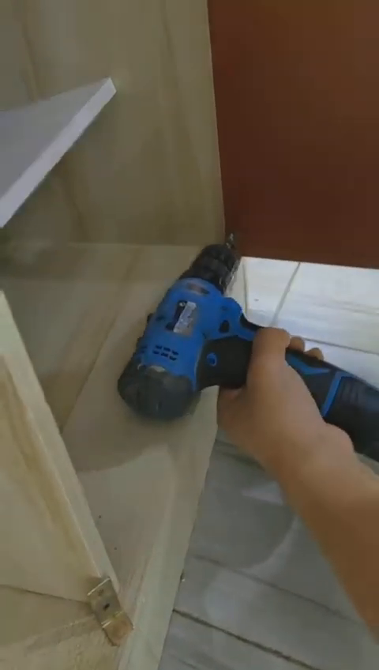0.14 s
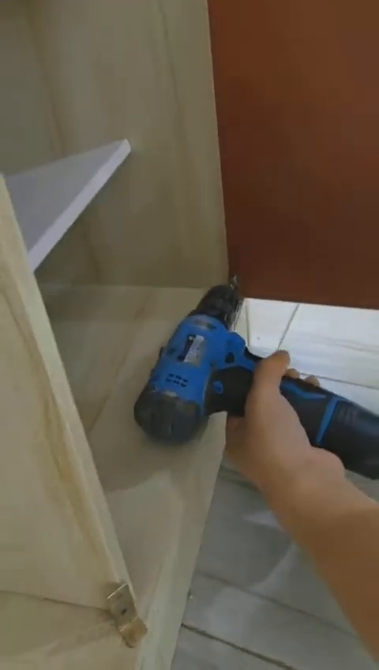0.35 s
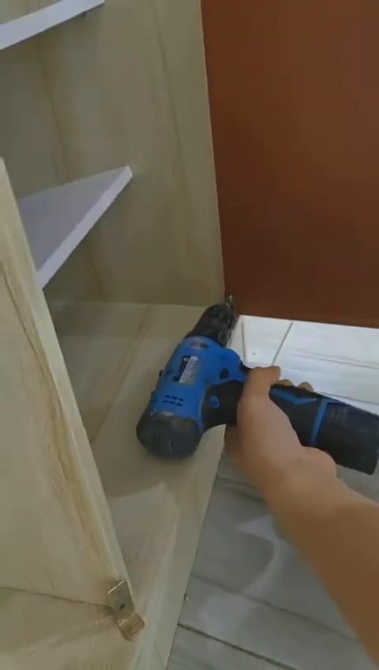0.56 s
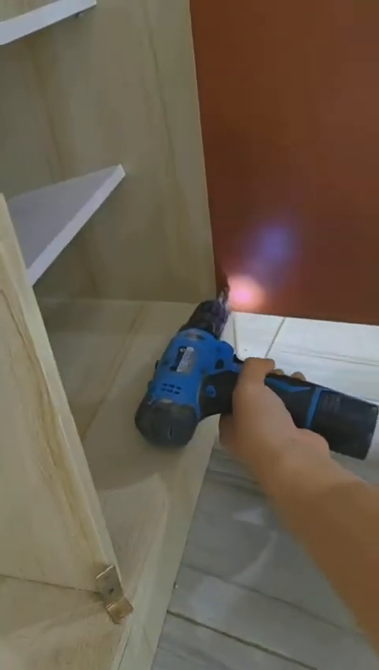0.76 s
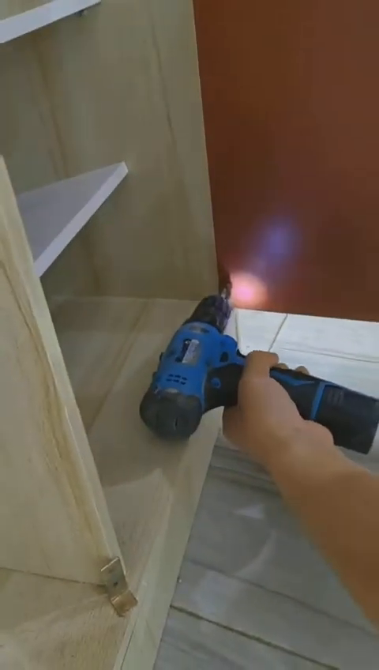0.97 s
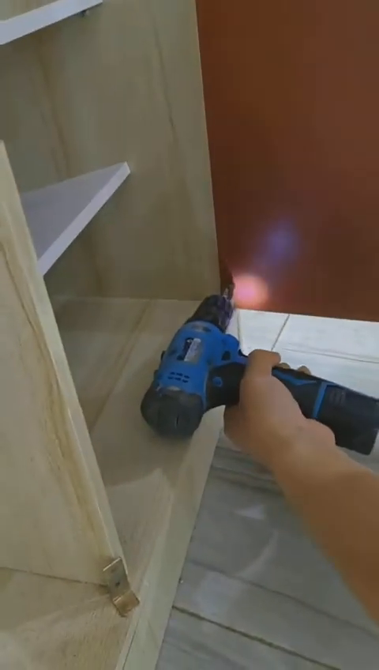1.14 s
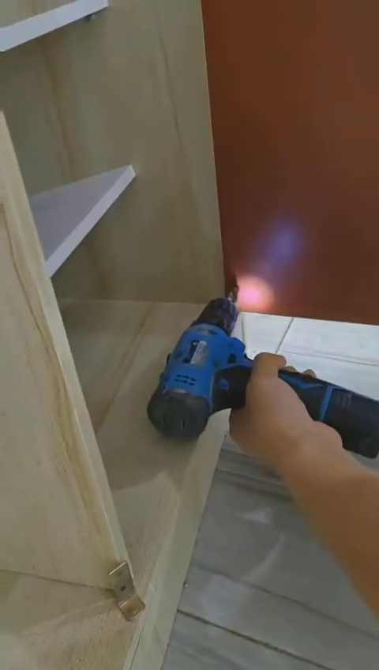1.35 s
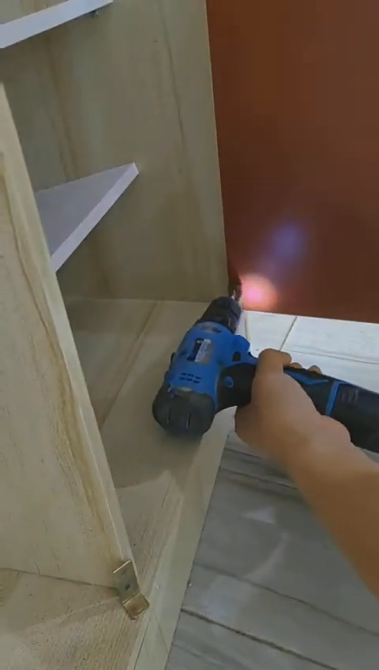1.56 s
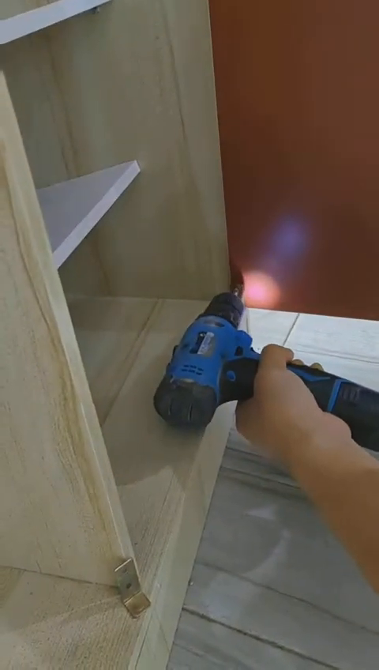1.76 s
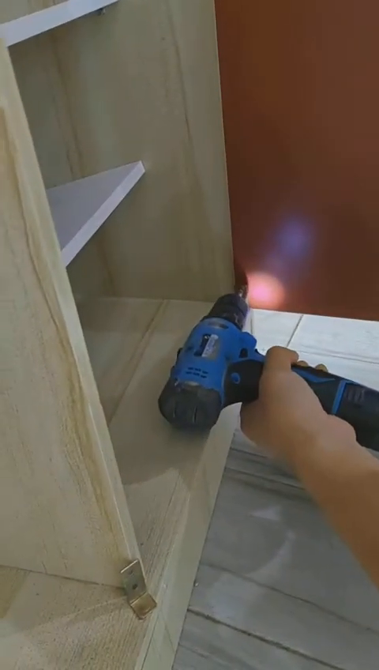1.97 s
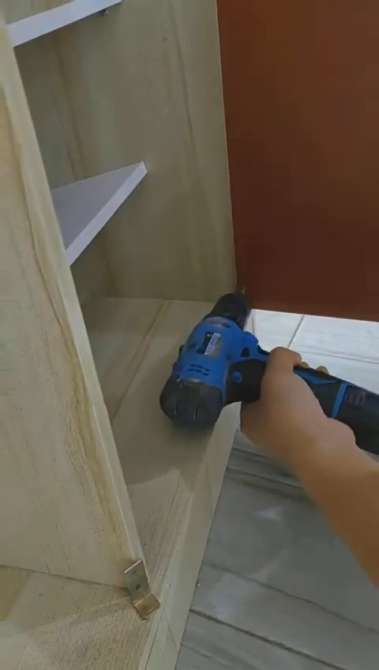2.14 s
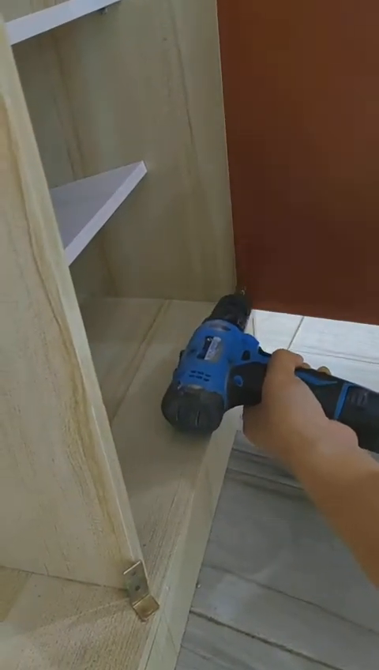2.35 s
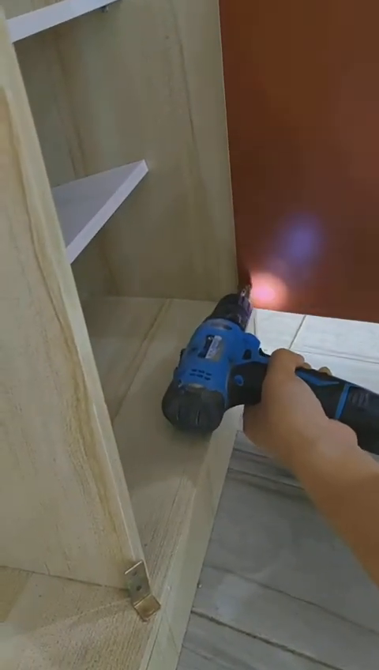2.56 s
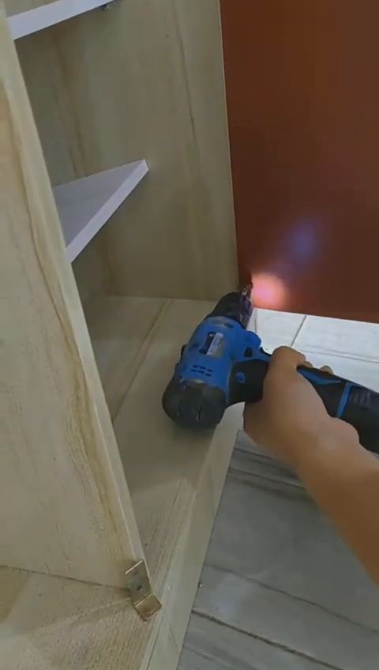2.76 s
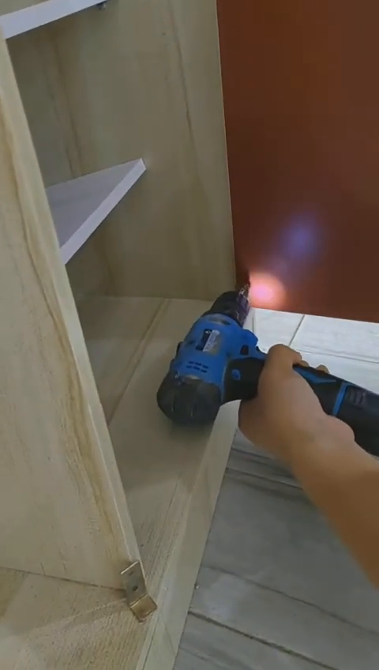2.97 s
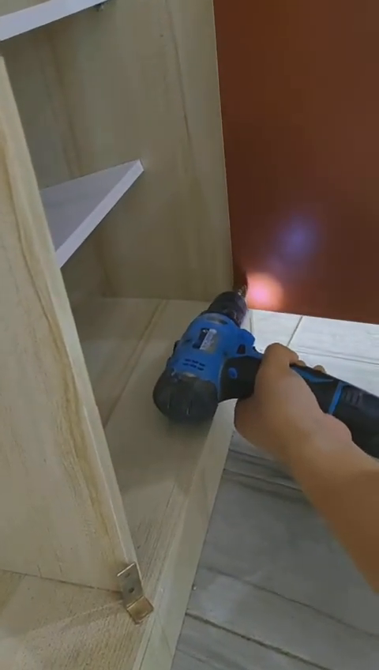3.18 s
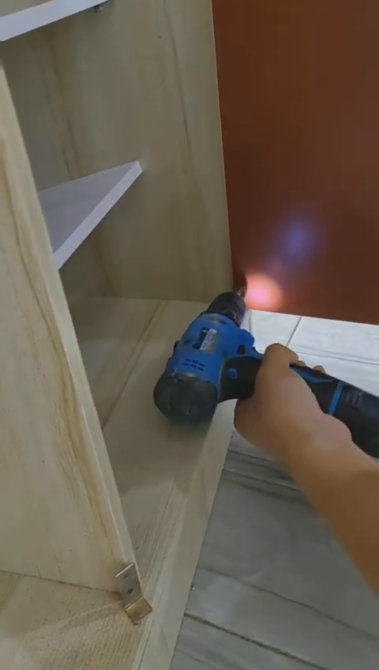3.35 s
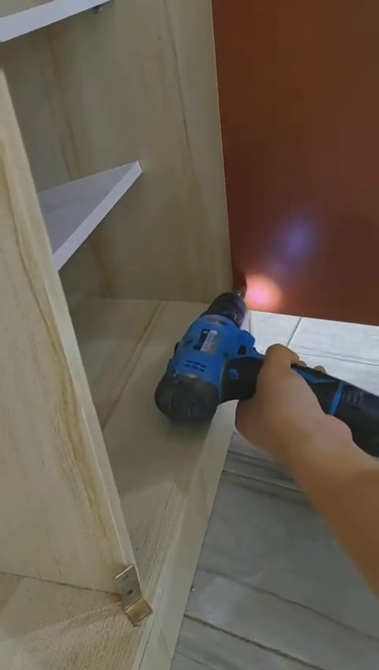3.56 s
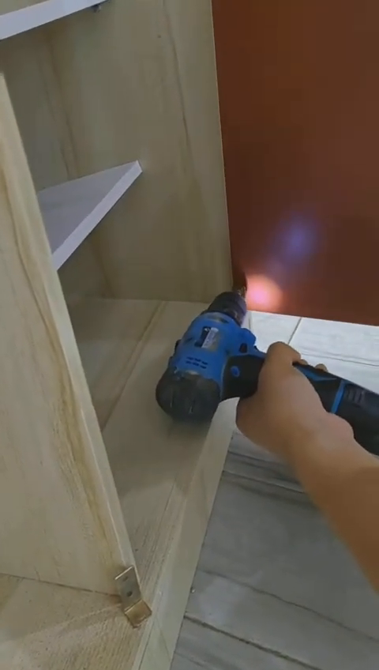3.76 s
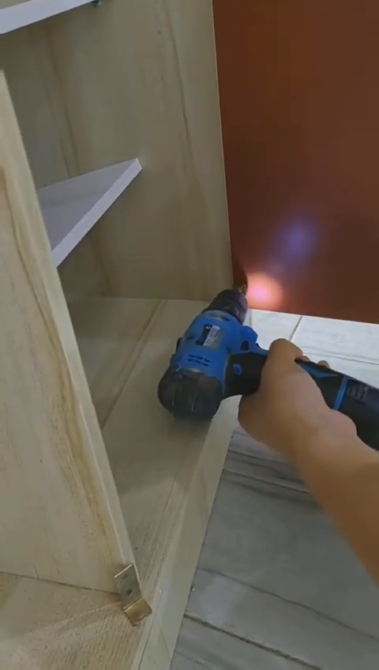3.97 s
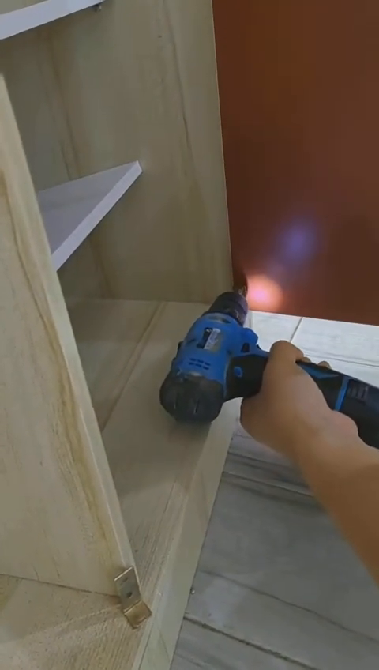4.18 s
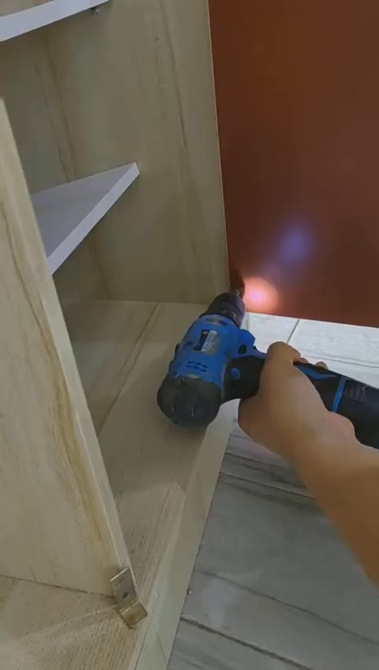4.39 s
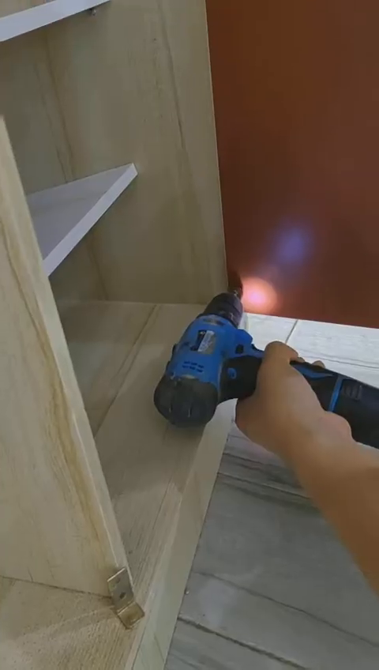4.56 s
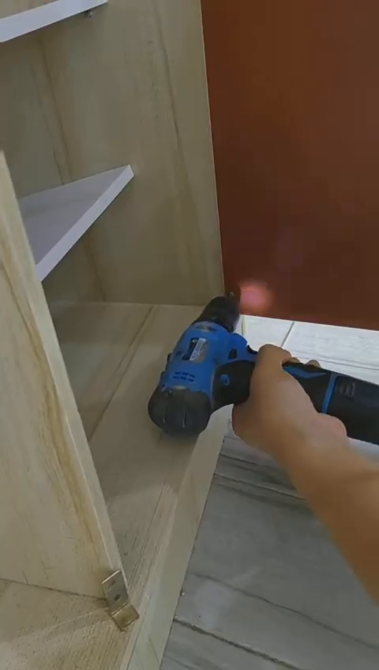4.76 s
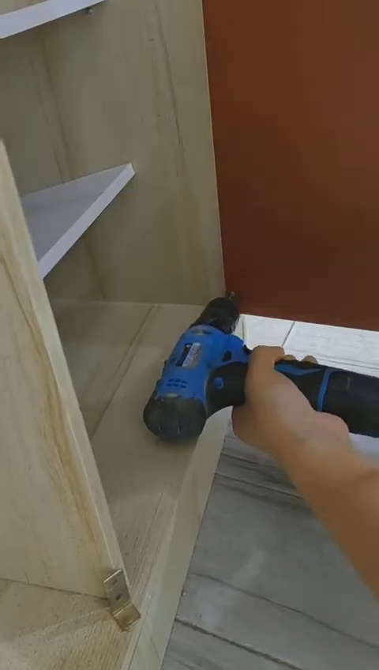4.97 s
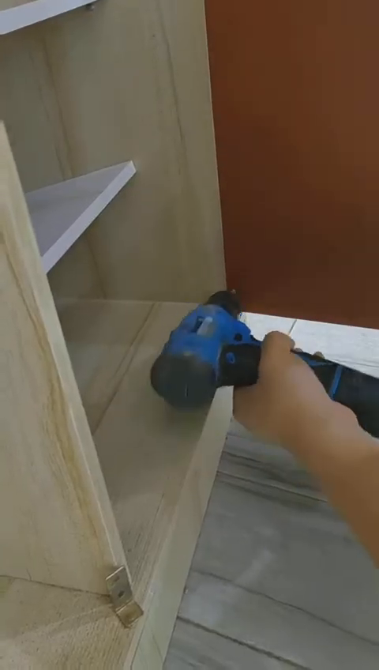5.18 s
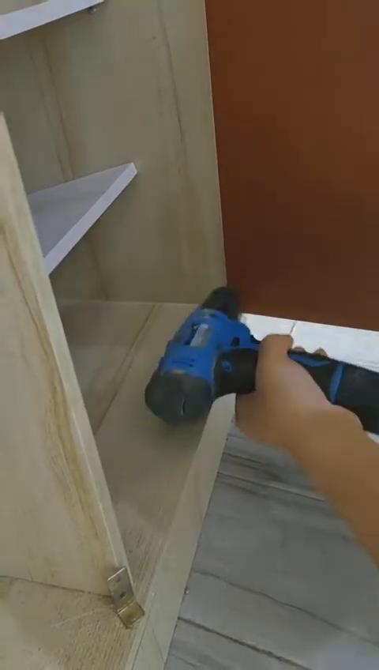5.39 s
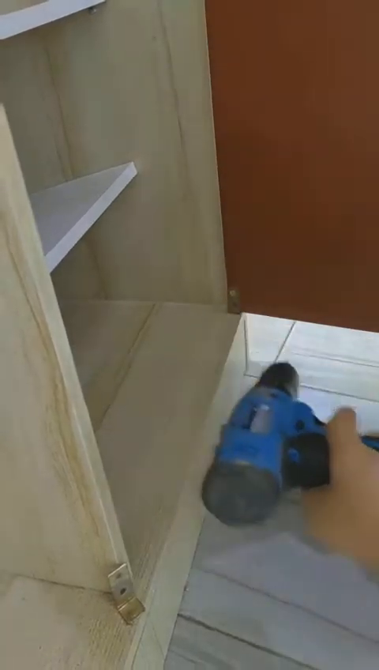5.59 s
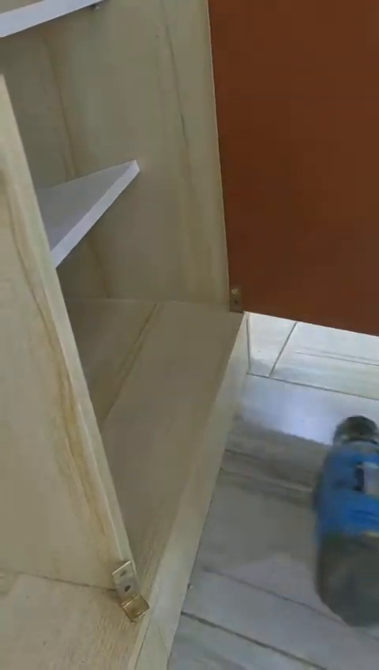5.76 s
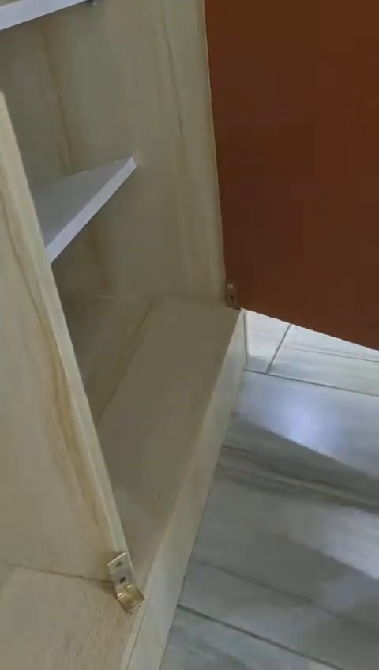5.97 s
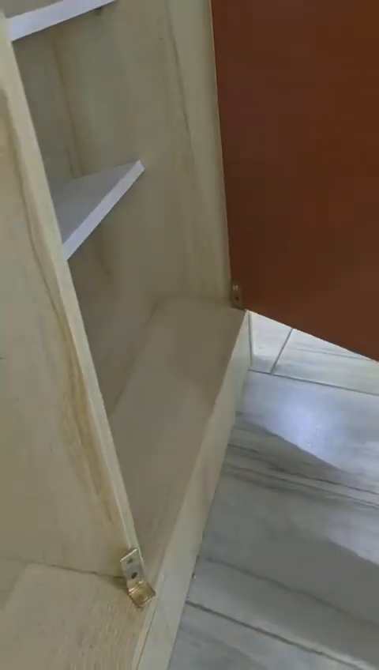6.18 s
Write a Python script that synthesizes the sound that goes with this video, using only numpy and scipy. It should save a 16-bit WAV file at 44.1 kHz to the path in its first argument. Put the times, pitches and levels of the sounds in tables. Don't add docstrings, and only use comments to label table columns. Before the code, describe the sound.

Soft rustling and hollow taps, then a small power drill buzzes briefly, pauses, whines steadily for two seconds, stops abruptly, and fabric brushes past.

```python
import sys
import numpy as np
from scipy import signal
from scipy.fft import rfft, irfft, next_fast_len
from scipy.io import wavfile
from scipy.ndimage import uniform_filter1d, map_coordinates

SR = 44100
rng = np.random.default_rng(int(sys.argv[2]) if len(sys.argv) > 2 else 0)


def level_to_linear(level):
    exponent = np.asarray(level, float) / 20
    return 10 ** exponent


def transcribe(signal):
    frames = np.atleast_2d(signal).T
    limited = np.clip(frames, -1, 1)
    pcm = np.round(limited * 32767).astype(np.int16)
    wavfile.write(sys.argv[1], SR, pcm)


N = 274743


def unit(x):
    return x / np.sqrt(np.mean(x ** 2) + 1e-20)


def along(points, hz):
    f, v = np.transpose(points)
    return np.interp(np.log(hz + 1), np.log(f + 1), v)


def curves(tables):
    t = np.arange(N) / SR
    s, *cols = np.transpose(np.concatenate(tables))
    gate = sum((t >= rows[0][0]) & (t <= rows[-1][0] + 0.05) for rows in tables) > 0
    return [np.interp(t, s, c) for c in cols] + [uniform_filter1d(gate * 1.0, size=64)]


def swells(rows, edge_s):
    t = np.arange(N) / SR
    gain = np.zeros(N)
    for start, length, db in rows:
        inside = np.minimum(t - start, start + length - t)
        gain += level_to_linear(db) * np.sin(np.pi / 2 * np.clip(inside / edge_s + 0.5, 0, 1)) ** 2
    return gain


def wobble(rate):
    coarse = np.arange(0, N + 8, 8)
    knots = rng.standard_normal(int(N * rate / SR) + 4)
    return np.interp(np.arange(N), coarse, map_coordinates(knots, [coarse * rate / SR]))


def filtered(x, response):
    m = next_fast_len(N + SR // 2)
    return irfft(rfft(x, m) * response(np.fft.rfftfreq(m, 1 / SR)), m)[:N]


def peak(f, hz, width):
    return 1j * f * width / (hz * hz - f * f + 1j * f * width)


def grit(spread_db):
    return unit(rng.standard_normal(N) * level_to_linear(spread_db * wobble(rate=1200)))


def rings(events, attack_s):
    out, t = np.zeros(N + SR), np.arange(SR // 3) / SR
    for s, db, hz, t60 in events:
        drift = np.cumsum(rng.standard_normal(len(t))) * 0.01
        ring = level_to_linear(-60 * t / np.clip(t60, 0.01, 0.5)) * np.sin(2 * np.pi * hz * t + drift)
        out[round(s * SR):][:len(t)] += level_to_linear(db) * ring * (1 - np.exp(-t / attack_s))
    return out[:N]


def clacks(events, sharp, attack_s, dull_hz):
    out, t = np.zeros(N + SR), np.arange(SR // 4) / SR
    f = np.fft.rfftfreq(len(t), 1 / SR)
    for s, db, hz, t60, splash_db in events:
        contact = level_to_linear(-60 * t / np.clip(0.59 * t60, 0.02, 0.4))
        room = level_to_linear(-19.0 - 60 * t / 0.52)
        burst = rng.standard_normal(len(t)) * (contact + room) * (1 - np.exp(-t / attack_s))
        colour = peak(f, hz, hz / sharp) + level_to_linear(splash_db - 2) * peak(f, 1.4 * hz, 1.8 * hz)
        bass_cut = (1j * f / (1j * f + 0.43 * hz)) ** 2
        clack = irfft(rfft(burst) * colour * bass_cut / (1 + 1j * f / dull_hz) ** 3, len(t))
        out[round(s * SR):][:len(t)] += level_to_linear(db) * clack / np.abs(clack).max()
    return out[:N]


# pitch_hz, density_db
AIR_COLOUR = [(200, -27.5), (340, -9), (437, -24.5), (645, -34.5), (682, 0.5), (784, 6), (1430, -20),
              (1710, -9.5), (6430, -21), (8500, -18.5), (9500, -33.5), (12400, -70), (20900, -120)]
AIR_DB = -68.5


def air():
    hiss = filtered(rng.standard_normal(N), lambda f: level_to_linear(along(AIR_COLOUR, f)))
    rumble = filtered(rng.standard_normal(N), lambda f: peak(f, 60, 24.0) + 0.5 * peak(f, 30, 26))
    return level_to_linear(AIR_DB + 0.41 * wobble(rate=12)) * (unit(hiss) + level_to_linear(9) * unit(rumble))


# start_s, peak_db, room_db (re blow)
KNOCK = [
    (0.987, -19.5, 7),
]
# pitch_hz, density_db
BOARD_COLOUR = [(360, -61.5), (620, -27), (882, -0.5), (1240, -6), (2930, -7.5), (3210, -18.5),
                (3510, -10.5), (6660, -18.5), (8420, -16.5), (12000, -25.5), (14000, -45)]
# pitch_hz, t60_s
ROOM_DECAY = [(500, 1), (1000, 0.86), (3000, 0.49), (8000, 0.52), (13000, 0.51)]


def knock():
    (s, db, room_db), = KNOCK
    hz, t, z = signal.stft(rng.standard_normal(SR), SR, nperseg=256)
    decay = level_to_linear(-60 * t / along(ROOM_DECAY, hz)[:, None])
    tail = signal.istft(z * decay, SR, nperseg=256)[1][:SR]
    t = np.arange(SR) / SR
    blow = rng.standard_normal(SR) * level_to_linear(-60 * t / 0.2) + level_to_linear(room_db - 14.5) * tail
    out = np.zeros(N + SR)
    out[round(s * SR) - 200:][:SR] = blow * (1 - np.exp(-t / 0.0078))
    struck = filtered(out[:N], lambda f: level_to_linear(along(BOARD_COLOUR, f)))
    return level_to_linear(db - 0.5) * struck / np.abs(struck).max()


# pitch_hz, width_hz
CABINET_MODES = [(108, 67), (200, 30.4), (500, 387)]
CALM_DB, DRIVEN_DB = [-71, -69.5, -69], [-27, -25.5, -28.5]
# start_s, length_s, level_db
LEANS = [
    [(.3, 0.26, -59), (.72, 0.71, -55.5), (1.69, 0.12, -39), (2.0, 0.785, -57.5), (3.08, .3, -56),
     (4.2, 0.52, -51.5), (4.74, 0.22, -45), (5.15, 0.21, -57.5)],
    [(.1, 0.13, -62.5), (.6, 0.36, -58), (1.15, 0.13, -64), (1.7, 0.1, -39), (2.3, .3, -61.5),
     (3.63, 0.525, -50), (4.82, 0.09, -53)],
    [(.33, 0.34, -58.5), (1.05, 0.44, -55), (1.7, 0.088, -51), (3.9, 1, -52.5), (5.7, 0.43, -68.5)],
]
LEAN_S = 0.054
# start_s, peak_db, pitch_hz, t60_s
THUMPS = [(0.73, -38.5, 191, 0.22), (0.862, -39.5, 197, 0.21), (0.954, -41, 184, 0.13),
          (1.1, -41.5, 196.4, 0.35), (1.241, -41, 182, 0.15), (1.334, -43, 201, 0.41),
          (1.526, -36.5, 183, 0.16), (1.681, -27, 133.7, 0.14), (1.739, -21.5, 102, 0.16),
          (2.082, -34.5, 169, 0.12), (2.314, -31, 186, 0.14), (2.434, -47.5, 94.2, 0.15),
          (2.519, -49, 99.6, 0.15), (2.566, -40, 136, 0.13), (2.607, -37.5, 197, 0.11),
          (2.689, -52, 121, 0.099), (2.745, -40.5, 198.5, 0.17), (2.871, -40.5, 189, 0.15),
          (3.049, -36, 201, 0.31), (3.661, -44.5, 213, 0.15), (4.24, -40, 139, 0.18),
          (5.178, -32.5, 91.5, 0.077), (5.21, -37, 131, 0.15), (5.248, -55, 120, 0.19),
          (5.299, -39, 99, 0.15)]
# start_s, peak_db, pitch_hz, t60_s, splash_db (re centre)
TAPS = [(1.134, -28.5, 476, 0.12, -18), (1.17, -40, 514, .3, -16), (1.736, -28, 764, .1, -6),
        (1.339, -46, 534, 0.29, -1), (1.4, -43, 721, 0.24, -33), (1.741, -24, 422, 0.12, -17),
        (2.179, -28, 808, 0.54, -3), (3.086, -27.5, 437, 0.14, -10), (3.119, -31.5, 244, 0.25, -14),
        (5.189, -49.5, 290, 0.17, -16), (5.229, -53, 307, 0.11, -25)]


def cabinet():
    gear_db, gate = curves(GEARS)
    hum = np.zeros(N)
    for (hz, width), calm, driven, leans in zip(CABINET_MODES, CALM_DB, DRIVEN_DB, LEANS):
        push = rng.standard_normal(N) * level_to_linear(1.5 * wobble(rate=14))
        mode = unit(filtered(push, lambda f: peak(f, hz, width) ** 2))
        hum += mode * (level_to_linear(calm) + gate * level_to_linear(gear_db + driven) + swells(leans, LEAN_S))
    return hum + rings(THUMPS, attack_s=0.003) + clacks(TAPS, sharp=14.0, attack_s=0.0015, dull_hz=2500)


# start_s, drag_db, tightness_db (brings out the thin hiss)
SLIDES = [
    [(0.0, -66, 5), (0.04, -67.5, 6), (0.128, -70, -8), (0.195, -55, 8.5), (0.29, -56, 3.5),
     (0.394, -45, 1), (0.45, -54.5, 8.5), (0.588, -51.5, 14), (0.73, -59, 8.5)],
    [(0.78, -64, 1), (0.9, -67.5, -6), (0.918, -57, -18), (0.96, -62.5, -16)],
    [(5.41, -73, -5), (5.456, -55.5, -7), (5.55, -58.5, 2.5), (5.62, -52.5, -2), (5.68, -55, 1),
     (5.76, -56.5, 1.5), (5.91, -54.5, 4.5), (6.05, -54.5, 2.5), (6.23, -59, 3)],
]
# pitch_hz, width_hz
CLOTH_BANDS = [(950, 320), (2300, 2200), (4800, 2000), (7000, 400), (11200, 6000), (6000, 1600),
               (2050, 1500)]
# start_s, length_s, level_db
HOLLOW = [
    (0.17, 0.044, -59),
    (0.3, 0.29, -53),
    (5.48, 0.2, -61.5),
    (5.76, 0.11, -52.5),
    (5.96, .15, -55),
]
# start_s, length_s, level_db
RASP = [
    (0.2, .1, -81),
    (0.34, 0.22, -54),
    (5.62, 0.065, -69),
    (5.78, 0.091, -49.5),
    (6.0, 0.093, -53.5),
]
STROKE_S, FOLD_DB, WEAVE_DB = 0.076, -7.5, -6.5
# start_s, length_s, level_db
FUZZ = [
    (.18, .12, -75),
    (.33, 0.43, -69),
    (5.45, .85, -67.5),
    (5.78, .04, -62),
    (6.0, .12, -73),
]
# start_s, length_s, level_db
SEAM = [
    (0.2, .45, -60.5),
    (5.8, 0.15, -49.5),
    (5.97, .17, -47),
]
# start_s, length_s, level_db
SCRAPE = [
    (5.445, 0.125, -49),
    (5.607, 0.046, -48),
]


def cloth():
    drag_db, tight_db, gate = curves(SLIDES)
    catch = level_to_linear(0.88 * wobble(rate=60))
    drag = gate * level_to_linear(drag_db)
    fold = swells(HOLLOW, STROKE_S) + drag * level_to_linear(FOLD_DB)
    weave = swells(RASP, STROKE_S) + drag * level_to_linear(WEAVE_DB + 0.81 * tight_db)
    hiss = drag * level_to_linear(tight_db)
    fibres, seam = swells(FUZZ, STROKE_S), swells(SEAM, STROKE_S)
    gains = (fold, drag, weave, hiss, fibres, seam, swells(SCRAPE, 0.024))
    out = np.zeros(N)
    for gain, (hz, width) in zip(gains, CLOTH_BANDS):
        out += gain * unit(filtered(grit(spread_db=0.5) * catch, lambda f: peak(f, hz, width) ** 2))
    return out


# start_s, peak_db, pitch_hz, t60_s, splash_db (re centre)
TICKS = [(0.371, -40, 3100, 0.1, 2), (0.688, -39, 3030, 0.1, -6), (0.7342, -41, 3100, 0.08, -22),
         (0.8086, -39.5, 3600, 0.068, -6), (0.915, -46, 1720, 0.1, -16), (1.2374, -49.5, 1530, 0.07, 6),
         (1.333, -37.5, 2850, 0.083, -19), (1.3962, -48.5, 7100, 0.71, -4.5),
         (1.5594, -18.5, 3270, 0.086, -5.5), (2.5106, -39, 2940, 0.089, -24), (2.527, -48, 3060, 0.1, -6),
         (2.6055, -57, 3270, 0.1, -16), (2.744, -48, 2900, 0.12, -25), (2.866, -48, 2750, 0.1, -14),
         (3.0475, -36, 2900, .1, -1), (3.087, -17.5, 3320, 0.12, -5), (5.017, -44.5, 2900, 0.1, -7),
         (5.1997, -46.5, 3350, 0.3, -12), (5.219, -44.5, 3660, 0.11, -16), (5.2954, -42, 3160, 0.24, -9),
         (5.4151, -49, 3350, 0.11, -16), (5.76, -44, 2500, 0.11, 0), (5.6106, -38, 3000, 0.1, -10),
         (6.187, -45, 1650, 0.089, -11)]


def ticks():
    return clacks(TICKS, sharp=11, attack_s=0.0007, dull_hz=8000)


# start_s, level_db
GEARS = [
    [(1.524, -59), (1.532, -40), (1.564, -27.5), (1.588, -30), (1.646, -27), (1.84, -26), (2.154, -28),
     (2.198, -32.5), (2.4, -80)],
    [(3.04, -81), (3.05, -43.5), (3.08, -28.5), (3.26, -27), (3.81, -26), (4.59, -28), (4.85, -32.5),
     (4.91, -49), (5.1, -76)],
]
# pitch_hz, density_db
GEAR_COLOUR = [(160, -34.5), (280, -13), (506, -25), (658, -12.5), (815, -15), (960, -10.5), (1450, -8.5),
               (2490, -2), (3030, 1), (3630, -3.5), (3940, -5.5), (8120, -10), (9420, -19), (13100, -24.5),
               (14200, -34.5)]
# pitch_hz, width_hz, level_db
HOUSING = [(600, 17, 5), (900, 74, 12), (1280, 12, -2), (2940, 24, -18), (4020, 19, 3), (4360, 31, -2),
           (4680, 12, -5), (5250, 48, -3), (6800, 114, -17.5), (7800, 260, -25), (8470, 27, -2.5)]
# pitch_hz, width_hz, level_db
PANEL = [(664, 29, -1.5), (1280, 32, 0), (1657, 60, 4.5), (1970, 34, -3.5)]
GROWL_DB, FIZZ_DB = -11.5, -0.5
STRAIN_DB_PER_HZ = 0.03


def gears(turn, sag):
    level_db, gate = curves(GEARS)
    teeth = grit(spread_db=0.33) * (1 + 0.14 * np.cos(turn / 3))
    teeth = teeth * level_to_linear(0.36 * wobble(rate=11) + 0.54 * wobble(rate=60))

    def body(f):
        modes = sum(0.62 * level_to_linear(0.93 * db) * peak(f, hz, width + 140) for hz, width, db in HOUSING)
        return level_to_linear(along(GEAR_COLOUR, f)) * (1 + modes)

    def low(f):
        return 1 / (1 + (f / 1900) ** 6)

    def high(f):
        return 1 / (1 + (5500 / (f + 1)) ** 8)

    def panel(f):
        return low(f) * (1 + sum(level_to_linear(db) * peak(f, hz, width) for hz, width, db in PANEL))

    rung = filtered(teeth, body)
    growl = unit(filtered(rung, panel))
    rattle = unit(filtered(rung, lambda f: (1 - low(f)) * (1 - high(f))))
    fizz = unit(filtered(rung, high))
    growl_gain = level_to_linear(GROWL_DB + STRAIN_DB_PER_HZ * sag + 1.13 * wobble(rate=9))
    fizz_gain = level_to_linear(FIZZ_DB + STRAIN_DB_PER_HZ * sag + 1.13 * wobble(rate=9))
    return gate * level_to_linear(level_db - 2.13) * (rattle + growl_gain * growl + fizz_gain * fizz)


# pull_s, bite_s (screw bites), sag_hz, sag_time_s, release_s
RUNS = [
    (1.525, 2.0, 150, .17, 2.165),
    (3.04, 3.55, 65, .6, 4.85),
]
FREE_HZ, SPIN_UP_S, BRAKE_HZ_PER_S, BRAKE_S = 992, 0.064, 8500, 0.036
TORQUE_DB, BRAKE_DB = 6, [8, -22]


def motor():
    t = np.arange(N) / SR
    hz, sag, torque_db = np.zeros(N), np.zeros(N), np.zeros(N)
    for (pull, bite, depth, slow, release), brake_db in zip(RUNS, BRAKE_DB):
        on = (t > pull) & (t < release + 0.5)
        load = depth * (1 - np.exp(-(np.clip(t - bite, 0, release - bite) / slow) ** 2))
        spin = np.exp(-np.clip(t - pull, 0, None) / SPIN_UP_S)
        braked = BRAKE_HZ_PER_S * np.clip(t - release, 0, None)
        hz += on * np.clip(FREE_HZ * (1 - spin) - load - braked, 0, None)
        sag += on * load
        braking = np.clip(np.minimum(t - release, release + BRAKE_S + 0.03 - t) / 0.024, 0, 1)
        starting = np.clip(3.5 * spin, 0, 1)
        torque_db += on * (TORQUE_DB * starting + (TORQUE_DB + 6 + brake_db) * braking)
    return hz, sag, torque_db


# multiple (of motor speed), pitch_hz, width_hz, level_db
VOICED = [(3, 2926, 130, -34), (3.265, 3070, 66, -34), (4, 3950, 190, -33.5), (9, 8800, 600, -46.5)]
WHINE_DB = -47.5


def whine(hz, torque_db):
    turn = 2 * np.pi * np.cumsum(hz * (1 + 0.0013 * wobble(rate=50))) / SR

    def flutter(db):
        return level_to_linear(db + 1.5 * wobble(rate=14) + 1.5 * wobble(rate=30))

    chatter = wobble(rate=79) * np.clip(abs(np.gradient(hz)) * SR / 4000, 0.15, 1.7)
    radiates = (hz / 500) ** 6 / (1 + (hz / 500) ** 6)
    orders = radiates * np.sin(turn + chatter) * flutter(WHINE_DB + torque_db)
    for multiple, mode_hz, width, db in VOICED:
        voice = abs(peak(multiple * hz, mode_hz, width)) ** 2
        orders += voice * np.sin(multiple * turn) * flutter(db)
    return orders, turn


def scene():
    hz, sag, torque_db = motor()
    tone, turn = whine(hz, torque_db)
    mono = tone + gears(turn, sag) + cloth() + cabinet() + knock() + ticks() + air()
    return np.array([mono, mono])


def thrift(x, rough_db, faint_db, split_hz):
    hz, _, z = signal.stft(x, SR, nperseg=2048, noverlap=1536)
    hz = hz[:, None]

    def blur(v, size):
        return uniform_filter1d(uniform_filter1d(v, size=size[0], axis=0), size=size[1], axis=1)

    luck = unit(blur(rng.standard_normal(z.shape), size=(6, 5)))
    power = abs(blur(abs(z) ** 2, size=(48, 2))) + 1e-20
    nearby = abs(blur(abs(z) ** 2, size=(5, 7)))
    around = abs(blur(power, size=(1, 7))) + 1e-20
    valley_db = np.clip(10 * np.log10(nearby / around + 1e-9), -3, 9)
    block = unit(blur(luck, size=(20, 2)))
    treble = hz > split_hz
    starved = (luck + valley_db / 2 < -np.where(treble, 0.25, 2.1)) & (hz > 1700)
    faint = treble & (power < level_to_linear(2 * (faint_db - 1.5 * block - 1.5 * luck)))
    gain = np.where(starved | faint, 0.03, level_to_linear(rough_db * luck * (hz > 900)))
    return signal.istft(z * gain, SR, nperseg=2048, noverlap=1536)[1][:N]


def roll_off(x):
    return signal.sosfilt(signal.butter(12, 14350, fs=SR, output="sos"), x)


TOP_HZ = 14150


def record(dry):
    mono = filtered(dry[0], lambda f: (f < TOP_HZ) * (0.03 + 1 / (1 + (72 / (f + 1)) ** 8)))
    mono = mono / (1 + abs(mono / 0.3) ** 4) ** 0.25
    mono = thrift(mono, rough_db=1.92, faint_db=-91.5, split_hz=8700)
    return roll_off(np.array([mono, mono]))


dry = scene()
out = record(dry)
transcribe(out)
```